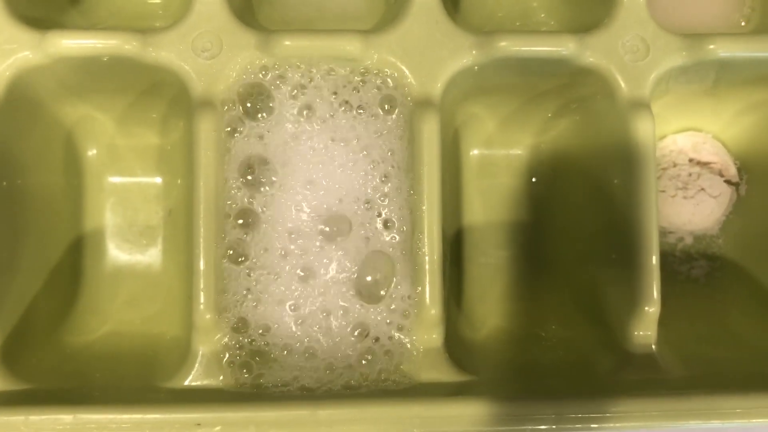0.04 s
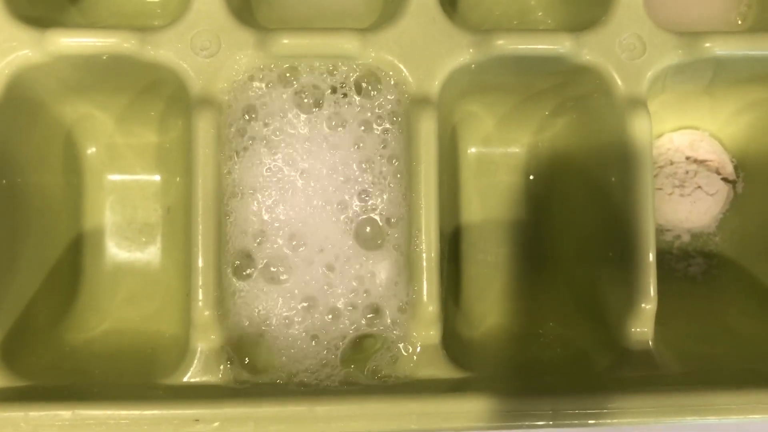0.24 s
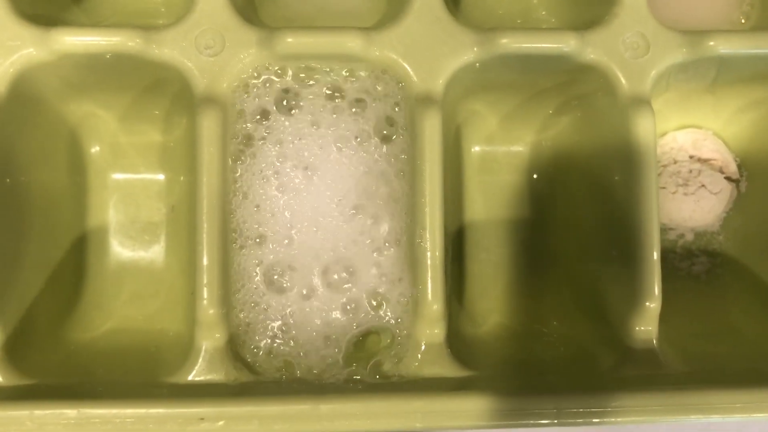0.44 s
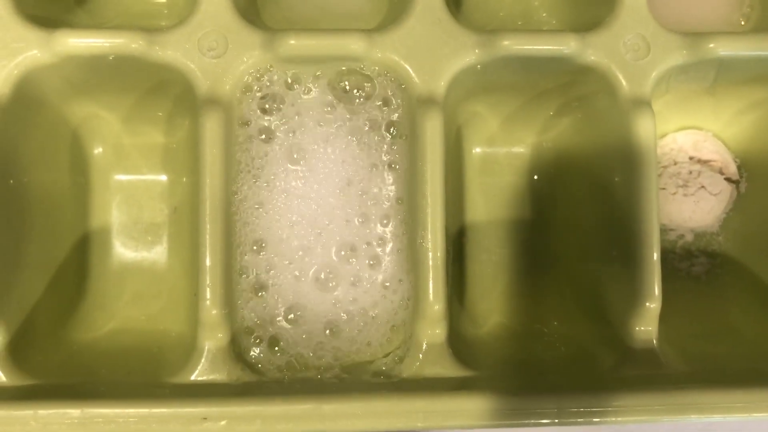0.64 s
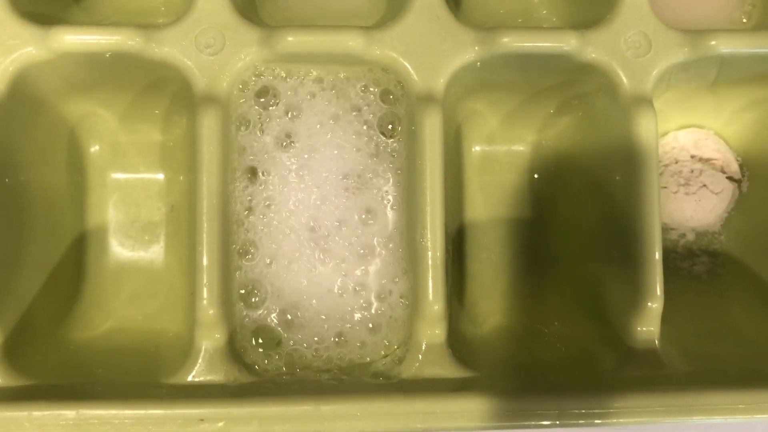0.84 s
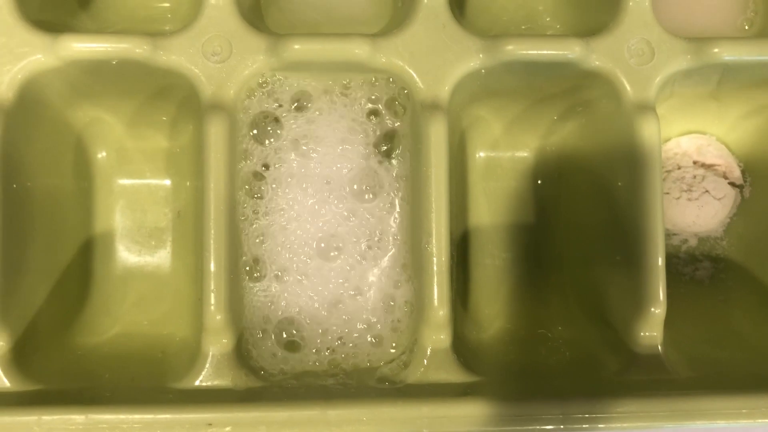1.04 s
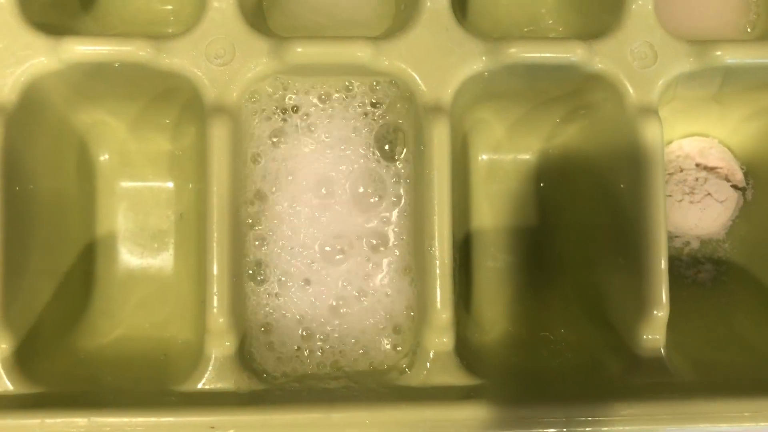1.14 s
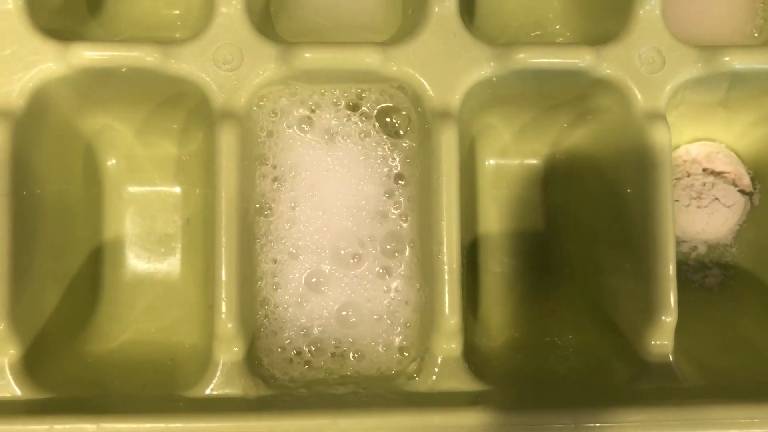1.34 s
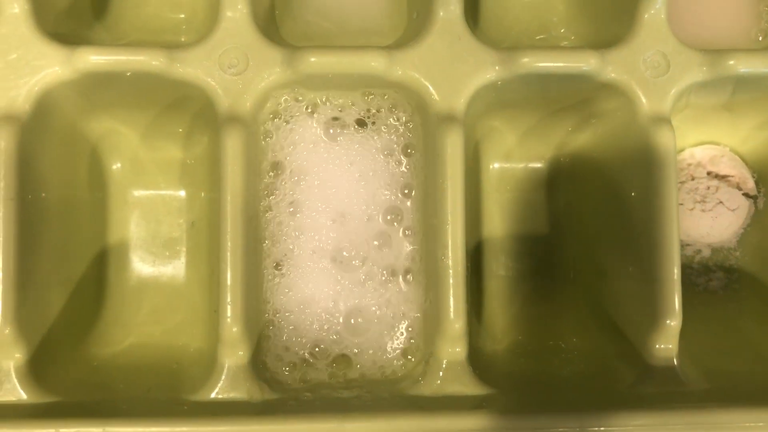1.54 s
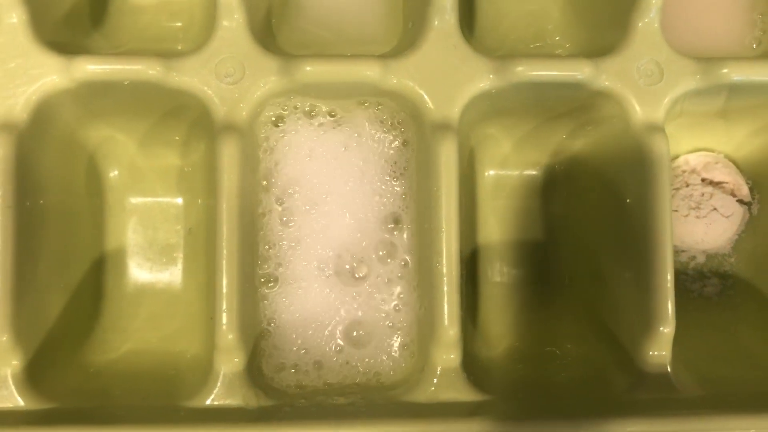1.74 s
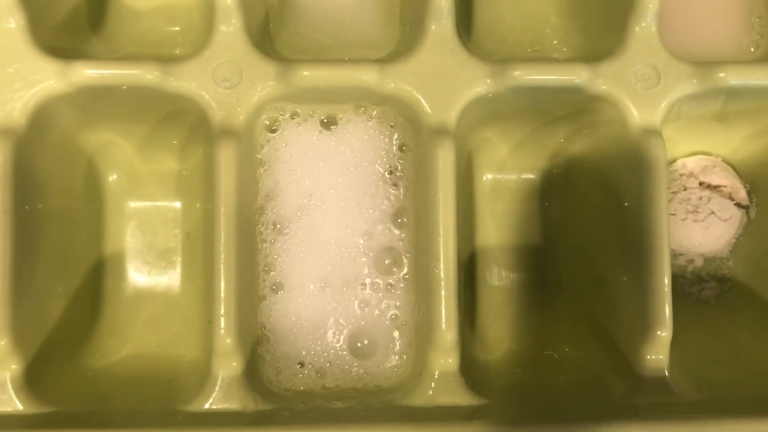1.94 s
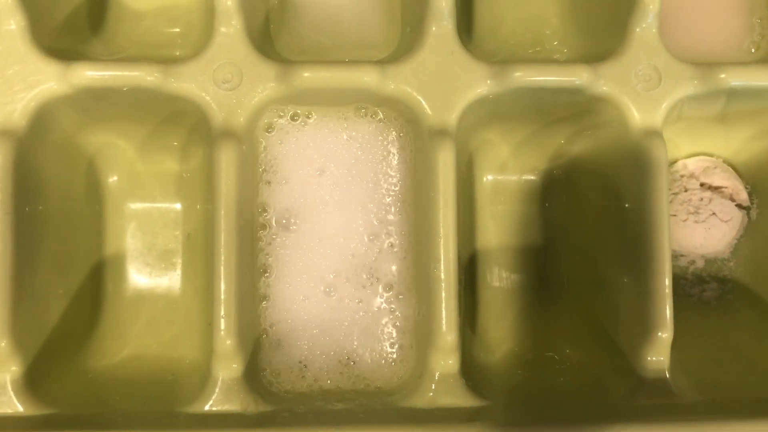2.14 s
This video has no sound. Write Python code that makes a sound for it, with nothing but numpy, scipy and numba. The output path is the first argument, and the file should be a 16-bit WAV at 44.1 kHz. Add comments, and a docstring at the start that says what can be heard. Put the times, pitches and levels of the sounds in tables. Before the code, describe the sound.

A continuous crisp fizz of tiny bursting bubbles, recorded close in a quiet room with faint low hum; early on come one bright clink and a short clattering tap, later small pops and two soft low thuds.

```python
"""Baking soda foams in vinegar in one cell of a plastic tray, close to a phone in a quiet kitchen.
The foam is random film bursts, rising damped sines for bubbles, and hiss, coloured by the cell's resonances.
A hard stick clinks once, then taps and rattles on the tray: ringing modes plus noisy cracks, with a room tail.
Two soft low thuds are pulses sagging in pitch; wavering hum lines and filtered-noise room air lie beneath."""
import sys
import numpy as np
from scipy import signal
from scipy.fft import rfft, irfft
from scipy.io import wavfile
from scipy.ndimage import uniform_filter1d
from numba import njit

SR = 44100
rng = np.random.default_rng(int(sys.argv[2]) if len(sys.argv) > 2 else 0)


def amplitude_ratio(level_db):
    """Convert a level in decibels to the matching linear amplitude (field) ratio."""
    exponent = np.asarray(level_db, float) / 20
    return 10 ** exponent


def pcm_store(signal):
    """Save signal as 16-bit PCM."""
    levels = np.round(np.clip(np.atleast_2d(signal), -1, 1) * 32767)
    wavfile.write(sys.argv[1], SR, levels.astype(np.int16).T)


N = 97020  # samples, 2.2 s

# Appliance hum lines. Each row: frequency in Hz, rms level in dB, depth of the random waver in dB before smoothing.
HUM_LINES = [(56.5, -60.5, 0.5), (172.4, -74, 2), (274.5, -72.5, 5)]
# Colour of the room air. Each row: frequency in Hz, relative gain in dB.
AIR_COLOUR = [(41, -28), (70, -8.5), (95, -13), (120, -8.5), (167, -6.5), (220, -8), (269, -6.5),
              (340, -7.5), (420, -10), (627, -6.5), (800, -15), (1000, -15.5), (1300, -41), (2200, -86)]
# Room air over time. Each row: time in seconds, level in dB, boost of its upper band in dB.
AIR_LEVEL = [(0, -62.5, 5.5), (.15, -61.5, -0.5), (.35, -62.5, 7), (.55, -59, -1), (1.0, -60.5, 1),
             (1.2, -60.5, -0.5), (1.4, -62, -3.5), (1.8, -60.5, -6), (2.05, -59, -2), (2.2, -57.5, -1)]
AIR_UPPER_HZ, AIR_UPPER_WIDTH_HZ = 460, 200

# Soft thuds through the table. Each row: start in seconds, level in dB, starting pitch in Hz.
THUDS = [(1.273, -49.5, 346), (2.003, -48.5, 350)]
THUD_END_HZ, THUD_FALL_S, THUD_PEAK_S = 115, 0.0043, 0.0055  # final pitch, pitch decay, time to the peak
TABLE_HZ, TABLE_DB, TABLE_PEAK_S = 294, -7, 0.0056  # brief ring of the table top, level against the thud

# Ringing modes of the stick's clink. Each row: frequency in Hz, level in dB before scatter, T60 in seconds.
CLINK_MODES = [(653, -19, 0.043), (1670, -16.5, 0.076), (2166, -10, 0.032), (2785, -0.5, 0.021),
               (3178, -4, 0.17), (4230, -23, 0.059), (4270, -1, 0.017), (5245, -11, 0.086),
               (5530, -30, 0.01), (7180, -11, 0.062), (7457, -6, 0.17), (9430, -17, 0.094),
               (9440, -15, 0.034), (12130, -14, 0.026), (13400, -8, 0.11), (13200, -22, .05),
               (13718, -24, .06), (13750, -5, 0.097)]
# The stick clinking on something hard. Each row: start in seconds, level in dB, extra ring level in dB.
CLINKS = [(.2072, -24.5, 2)]
# Colour of the clink's crack. Each row: frequency in Hz, relative gain in dB.
CLINK_CRACK = [(250, -27), (550, -12.5), (1000, -10), (1600, -9.5), (2700, -6), (3700, -27), (4500, -4),
               (5600, -7), (6600, -18), (7400, -24), (9500, -9), (11300, -24), (13300, 1), (15000, -36)]
CLINK_CRACK_DB, CLINK_CRACK_S = 3, 0.0021  # crack level, decay time constant

# Ringing modes of stick on tray. Each row: frequency in Hz, level in dB before scatter, T60 in seconds.
TRAY_MODES = [(1527, -12, 0.061), (1978, -11.5, 0.062), (2620, -2, 0.034), (4180, -11, 0.057),
              (4630, 1, 0.071), (5120, 0, 0.035), (6060, -6.5, 0.033), (14310, -19, .08), (9062, -5, .22)]
# The stick tapping and rattling on the tray. Each row: start in seconds, level in dB, extra ring level in dB.
TAPS = [(.392, -60, -13), (.397, -52, -16), (.408, -68, -12), (.4253, -34.5, 1), (.431, -44, -3),
        (.4335, -37, -14), (.437, -42, -7), (.4415, -61, -16), (.454, -50, -13), (.461, -52, -8),
        (.476, -47, -4), (.482, -44, -14), (.485, -46, -12)]
# Colour of the tap's crack. Each row: frequency in Hz, relative gain in dB.
TAP_CRACK = [(180, -55), (300, -40), (1100, -10), (2520, -4.5), (3130, -7.5), (5080, -5), (7080, -20),
             (9090, -19), (16000, -16)]
TAP_CRACK_DB, TAP_CRACK_S = 3.5, 0.0014  # crack level, decay time constant

GRIP_S, GRIP_FADE_S, GRIP_DB = 0.021, 0.0028, -16  # ring drops: perhaps fingers closing on the stick
RATTLE_DB, RATTLE_S = -17.5, 0.02  # rough tail after each crack, level and decay time constant
CLICK_DB = 14.5  # clean first contact, over the noise of the crack
LAG_CYCLES = 1.8  # bending waves: each frequency of a crack arrives this many of its cycles late

ROOM_DB, ROOM_RISE_S = -10.5, 0.0046  # tail level against the direct sound, time to build up
ROOM_T60_S, ROOM_TREBLE_T60_S, ROOM_SPLIT_HZ = 0.4, 0.17, 11400
# Colour of the room tail. Each row: frequency in Hz, relative gain in dB.
ROOM_COLOUR = [(500, 2.5), (3200, -6.5), (7400, -3), (13000, 2)]

# Foam colour as it leaves the cell. Each row: frequency in Hz, relative gain in dB.
FOAM_COLOUR = [(410, -41), (700, -15), (854, -12.5), (1170, -4.5), (1630, -8.5), (2150, -8), (2390, -7.5),
               (3610, -1), (5220, -3), (8000, -3.5), (11000, -4.5), (14300, -3.5), (15300, -5), (16500, -5)]
# Air resonances of the cell. Each row: frequency in Hz, width in Hz, gain in dB.
CELL_RESONANCES = [(1226, 340, 0.5), (2125, 250, -2.5), (3586, 520, -3)]
# Foam over time. Each row: time in seconds, foam level in dB, extra level of the lowest cell resonance in dB.
FOAM_ACTIVITY = [(0, -44.5, -2), (.2, -47, -0.5), (.35, -46, -3), (.55, -46.5, -4.5), (.75, -46.5, 2),
                 (.95, -46, -8.5), (1.1, -46.5, -6), (1.25, -46.5, -0.5), (1.45, -46.5, -6),
                 (1.65, -46.5, -6), (1.85, -46, 4.5), (2.05, -46, -1.5), (2.2, -46.5, 5.5)]
# Larger single pops. Each row: start in seconds, level in dB, starting pitch in Hz.
POPS = [(0.905, -46, 3800), (.9402, -32, 7000), (0.945, -42, 8000), (0.9546, -28, 8500), (1.073, -37, 7040),
        (1.5427, -32.5, 4000), (1.814, -45, 5000), (2.024, -35, 6000)]
BURSTS_PER_S, BURST_SPREAD_DB, HISS_DB = 2000, 4, 0.5  # tiny film bursts, hiss level against them
BUBBLES_PER_S, BUBBLE_DB, BUBBLE_SPREAD_DB = 230, -16.5, 7.5  # bubble level against the bursts
BUBBLE_HZ, BUBBLE_OCTAVES = 6400, 0.614  # median pitch, standard deviation
BUBBLE_CYCLES = 7.6  # a bubble falls 26 dB in about this many cycles
LARGEST = 2.3  # biggest burst or bubble, in spreads

TOP_HZ = 15920


def unit(x):
    """Scale to rms 1."""
    return x / np.sqrt(np.mean(x ** 2))


def colour(x, table):
    """Minimum-phase filter whose gain follows the table's (Hz, dB) points."""
    hz, db = np.array(table, float).T
    bins_hz = np.arange(1025) * SR / 2048
    gain_db = np.interp(np.log(bins_hz + 1), np.log(hz), db)
    # Folding the cepstrum onto positive time makes the filter causal
    cepstrum = irfft(np.log(amplitude_ratio(gain_db)))
    cepstrum[1:1024] *= 2
    cepstrum[1025:] = 0
    impulse = irfft(np.exp(rfft(cepstrum)))
    return signal.fftconvolve(x, impulse)[:len(x)]


def peak(x, hz, width):
    """Two-pole resonance, gain 1 at the centre."""
    return signal.lfilter(*signal.iirpeak(hz, hz / width, SR), x)


def walk(count):
    """Random levels, count a second, smoothed twice."""
    hold = SR // count
    steps = np.repeat(rng.standard_normal(N // hold + 1), hold)
    return uniform_filter1d(uniform_filter1d(steps, hold), hold)[:N]


def kitchen():
    """Appliance hum as wavering sines, and room air as low coloured noise of drifting level."""
    t = np.arange(N) / SR
    hum = np.zeros(N)
    for hz, db, waver_db in HUM_LINES:
        level = np.sqrt(2) * amplitude_ratio(db + waver_db * walk(count=10))
        hum += level * np.sin(2 * np.pi * (hz * t + rng.random()))
    at, db, upper_db = np.array(AIR_LEVEL, float).T
    air = unit(colour(rng.standard_normal(N), AIR_COLOUR))
    boost = amplitude_ratio(np.interp(t, at, upper_db)) - 1
    air = air + boost * peak(air, AIR_UPPER_HZ, AIR_UPPER_WIDTH_HZ)
    return hum + amplitude_ratio(np.interp(t, at, db) + 1.6 * walk(count=6)) * air


def thuds():
    """Low pulses that sag in pitch, with a short ring of the table."""
    out = np.zeros(N)
    for at, db, hz in THUDS:
        t = np.maximum(np.arange(N) / SR - at, 0)
        sag = (hz - THUD_END_HZ) * THUD_FALL_S * (1 - np.exp(-t / THUD_FALL_S))
        turns = THUD_END_HZ * t + sag
        # Each envelope swells to 1 at its peak time, then dies away
        thud_shape = np.e * t / THUD_PEAK_S * np.exp(-t / THUD_PEAK_S)
        table_shape = np.e * t / TABLE_PEAK_S * np.exp(-t / TABLE_PEAK_S)
        out += amplitude_ratio(db) * thud_shape * np.sin(2 * np.pi * turns)
        out += amplitude_ratio(db + TABLE_DB) * table_shape * np.sin(2 * np.pi * TABLE_HZ * t)
    return out


def struck(blows, modes, crack, crack_db, crack_s, scatter_db):
    """Each blow rings the modes afresh and gives a noisy crack, its lows lagging as in bending waves."""
    length = 20000
    out, t = np.zeros(N + length), np.arange(length) / SR
    hz, mode_db, t60 = np.array(modes, float).T[:, :, None]
    grip = amplitude_ratio(GRIP_DB * (1 + np.tanh((t - GRIP_S) / GRIP_FADE_S / 2)) / 2)
    onset = np.minimum(t / 0.00051, 1)
    lag_hz = np.maximum(np.fft.rfftfreq(length, 1 / SR), 150)
    lag = np.exp(-2j * np.pi * LAG_CYCLES * np.log(lag_hz))
    shape = np.exp(-t / crack_s) + amplitude_ratio(RATTLE_DB) * np.exp(-t / RATTLE_S)
    for at, db, ring_db in blows:
        size = amplitude_ratio(mode_db + ring_db + scatter_db * rng.standard_normal(hz.shape))
        decay = np.exp(-np.log(1000) * t / t60)
        ring = np.sum(size * np.sin(2 * np.pi * hz * t) * decay, axis=0)
        push = rng.standard_normal(length) * shape
        push[0] += amplitude_ratio(CLICK_DB)
        snap = colour(push, crack)
        snap = snap * np.sqrt(np.sum(shape ** 2) / np.sum(snap ** 2))  # energy of the envelope
        snap = irfft(rfft(snap) * lag)
        i = int(at * SR)
        out[i:i + length] += amplitude_ratio(db) * (ring * grip * onset + amplitude_ratio(crack_db) * snap)
    return out[:N]


def room(x):
    """Add a diffuse noise tail whose treble dies sooner."""
    t = np.arange(SR // 2) / SR
    noise = colour(rng.standard_normal(SR // 2), ROOM_COLOUR)
    low = signal.lfilter(*signal.butter(2, ROOM_SPLIT_HZ, fs=SR), noise)
    low_fade = np.exp(-np.log(1000) * t / ROOM_T60_S)
    treble_fade = np.exp(-np.log(1000) * t / ROOM_TREBLE_T60_S)
    tail = (low * low_fade + (noise - low) * treble_fade) * np.minimum(t / ROOM_RISE_S, 1)
    tail = tail / np.sqrt(np.sum(tail ** 2))
    return x + amplitude_ratio(ROOM_DB) * signal.fftconvolve(x, tail)[:N]


@njit
def grains(n, at, hz, size, cycles, glide):
    """Damped sines that last a few cycles and rise in pitch, as ringing bubbles do."""
    y = np.zeros(n)
    for k in range(len(at)):
        phase, level, turn = 0., size[k], 2 * np.pi * hz[k] / SR
        fade = np.exp(-hz[k] / SR / cycles * 3)
        for i in range(int(at[k] * SR), n):
            y[i] += level * np.sin(phase)
            phase += turn
            level *= fade
            turn *= 1 + glide * hz[k] / SR
            if level < size[k] * .003 or turn > 3:  # inaudible, or close to Nyquist
                break
    return y


def film_bursts():
    """Bursting films as single-sample impulses of random time, size and sign."""
    chance, rank, side = rng.random((3, N))
    size = amplitude_ratio(BURST_SPREAD_DB * np.minimum(-np.log(1 - rank), LARGEST))
    return (chance < BURSTS_PER_S / SR) * size * np.sign(side - .5)


def bubbles():
    """Small bubbles that ring at random moments, each with its own pitch and size."""
    wait, rank = rng.random((3000, 2)).T
    at = np.cumsum(-np.log(1 - wait)) / BUBBLES_PER_S
    hz = np.clip(BUBBLE_HZ * 2 ** (BUBBLE_OCTAVES * rng.standard_normal(3000)), 800, 15000)
    size = amplitude_ratio(BUBBLE_SPREAD_DB * np.minimum(-np.log(1 - rank), LARGEST))
    return grains(N, at, hz, size, BUBBLE_CYCLES, 0.046)


def foam():
    """Bursts, bubbles and hiss ring the cell's air and follow the foam's activity; larger pops stand out."""
    hiss = amplitude_ratio(HISS_DB) * rng.standard_normal(N)
    fizz = colour(unit(film_bursts()) + hiss + amplitude_ratio(BUBBLE_DB) * unit(bubbles()), FOAM_COLOUR)
    at, level_db, low_db = np.array(FOAM_ACTIVITY, float).T
    t = np.arange(N) / SR
    rings = [amplitude_ratio(db + 0.47 * walk(count=12)) * peak(fizz, hz, width) for hz, width, db in CELL_RESONANCES]
    fizz = unit(fizz + amplitude_ratio(np.interp(t, at, low_db)) * rings[0] + sum(rings[1:]))
    level = amplitude_ratio(np.interp(t, at, level_db) + 0.48 * walk(count=25))
    pop_at, pop_db, pop_hz = np.array(POPS, float).T
    return fizz * level + grains(N, pop_at, pop_hz, amplitude_ratio(pop_db), 5.5, 0.033)


def scene():
    """All sources at the phone; only the stick's blows excite the room tail."""
    hits = struck(CLINKS, CLINK_MODES, CLINK_CRACK, CLINK_CRACK_DB, CLINK_CRACK_S, scatter_db=0.4)
    hits = hits + struck(TAPS, TRAY_MODES, TAP_CRACK, TAP_CRACK_DB, TAP_CRACK_S, scatter_db=2.8)
    return (kitchen() + thuds() + room(hits) + foam())[None]


def top_cut(x):
    """Nothing passes above the cut-off."""
    return signal.sosfilt(signal.butter(12, 16660, fs=SR, output="sos"), x)


def record(dry):
    """The phone cuts everything from TOP_HZ up."""
    passed = np.fft.rfftfreq(N, 1 / SR) < TOP_HZ
    mix = irfft(rfft(dry) * passed, N)
    return top_cut(mix)


dry = scene()
out = record(dry)
pcm_store(out)
```